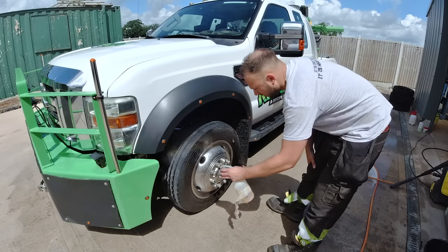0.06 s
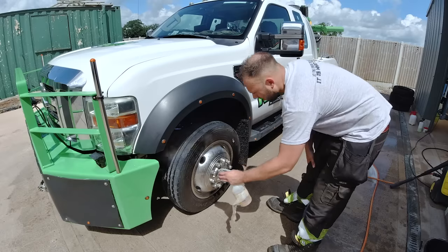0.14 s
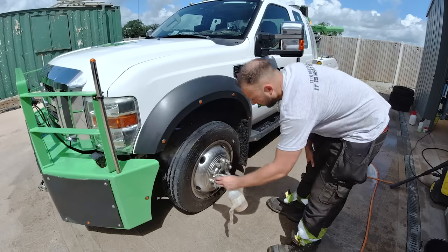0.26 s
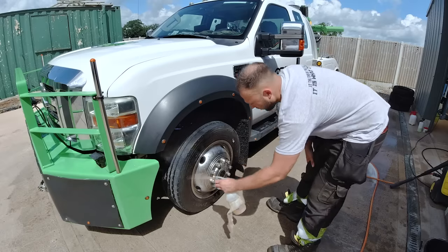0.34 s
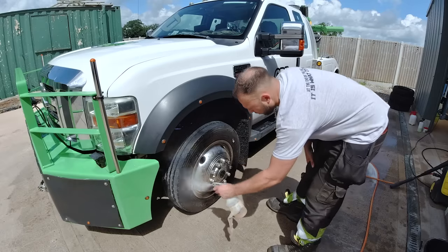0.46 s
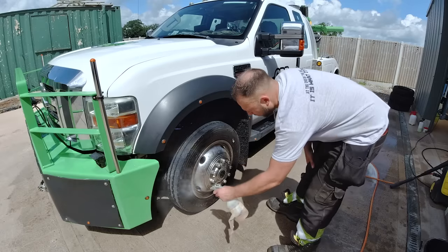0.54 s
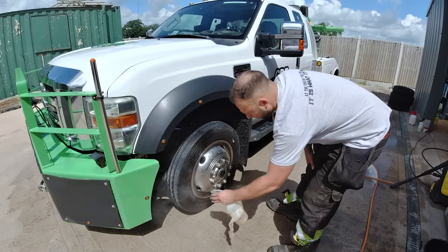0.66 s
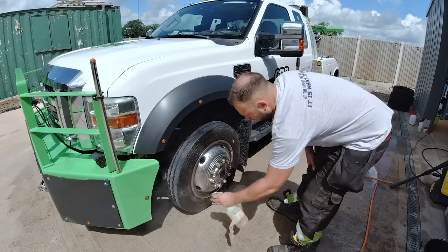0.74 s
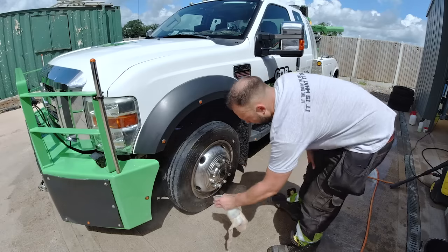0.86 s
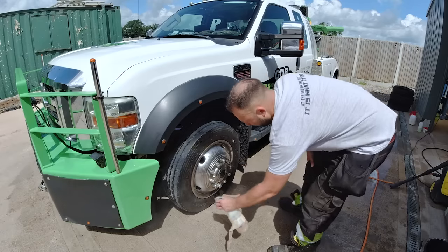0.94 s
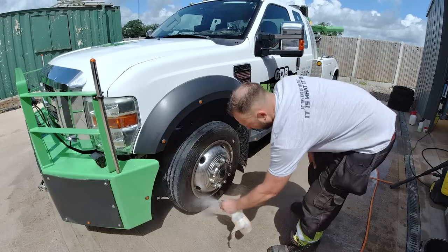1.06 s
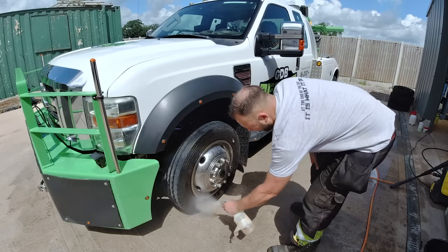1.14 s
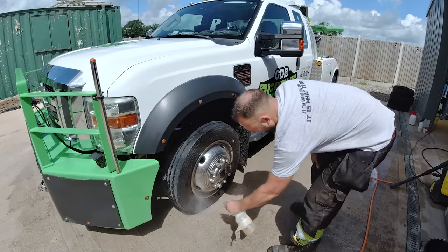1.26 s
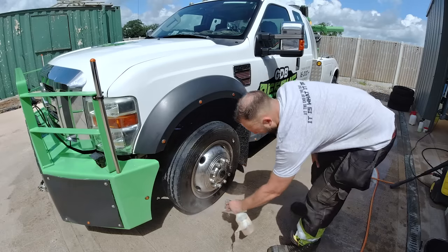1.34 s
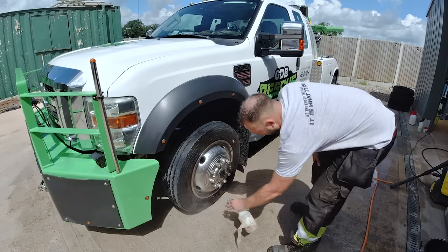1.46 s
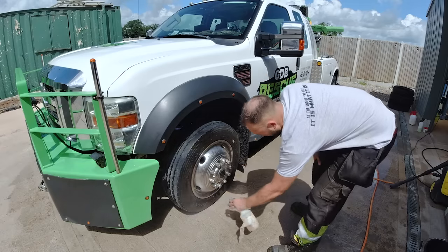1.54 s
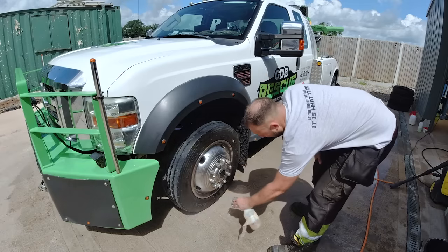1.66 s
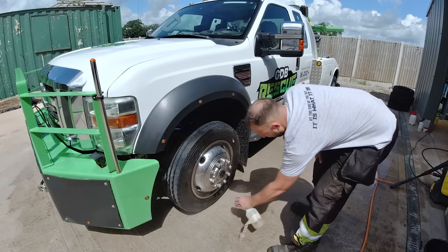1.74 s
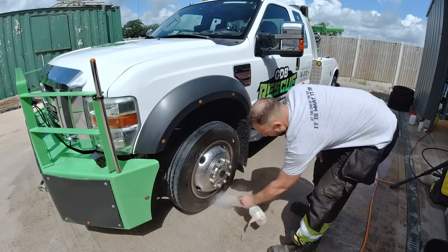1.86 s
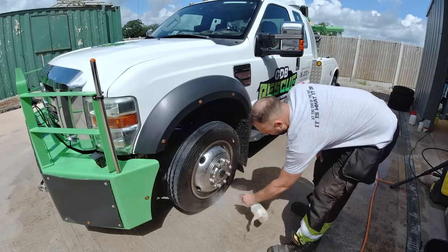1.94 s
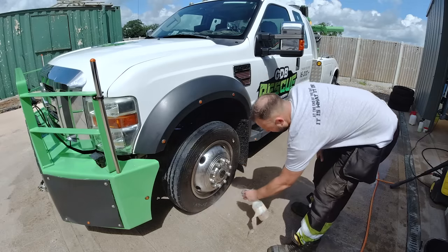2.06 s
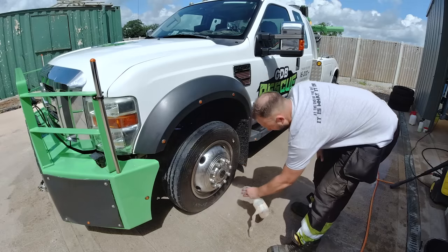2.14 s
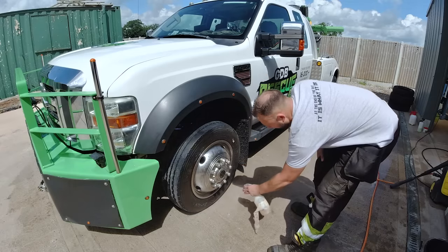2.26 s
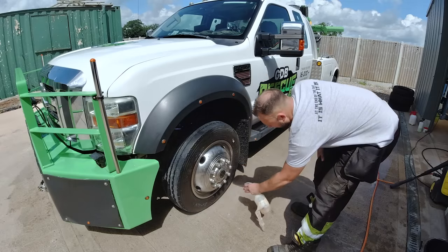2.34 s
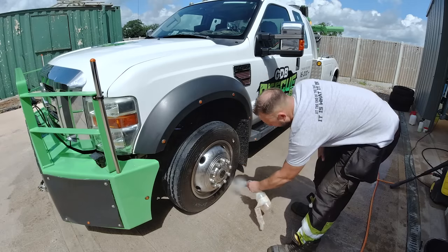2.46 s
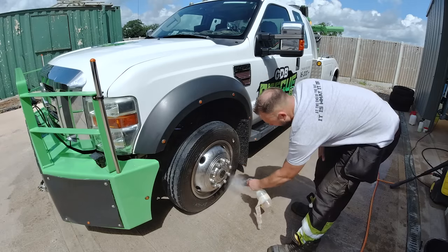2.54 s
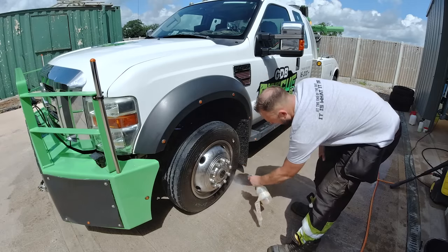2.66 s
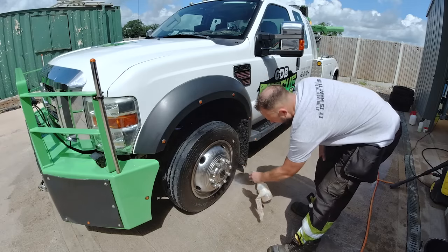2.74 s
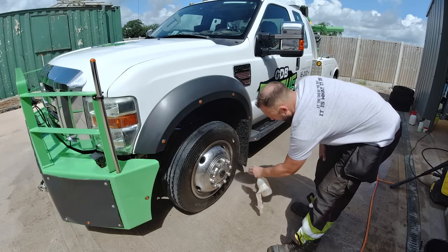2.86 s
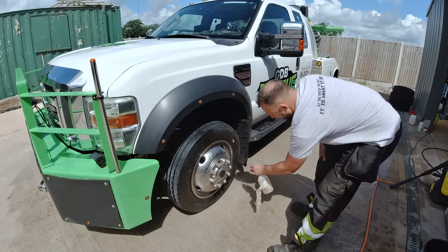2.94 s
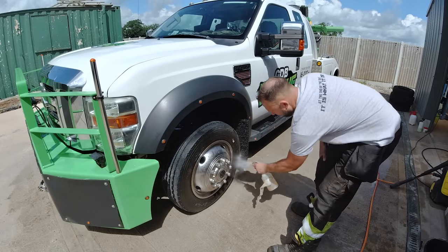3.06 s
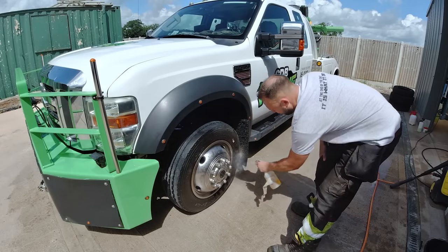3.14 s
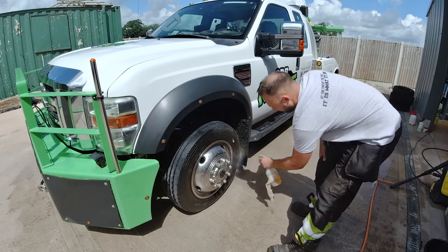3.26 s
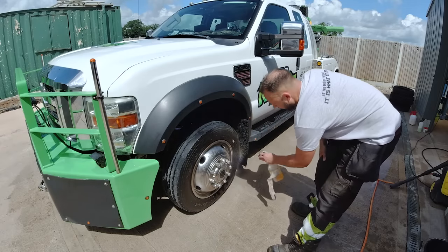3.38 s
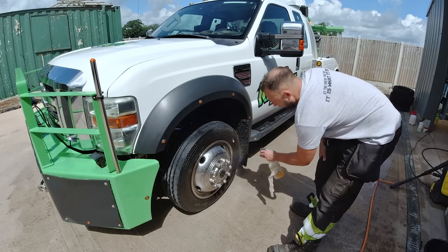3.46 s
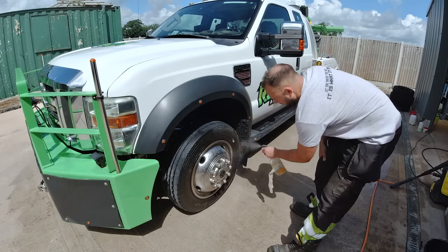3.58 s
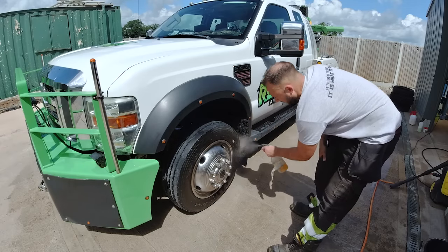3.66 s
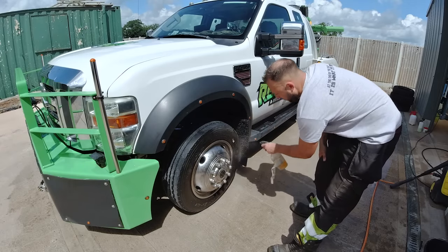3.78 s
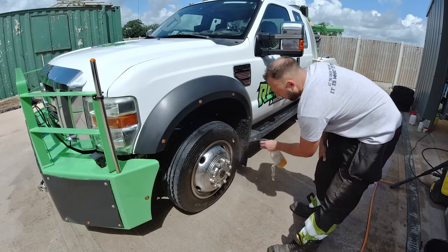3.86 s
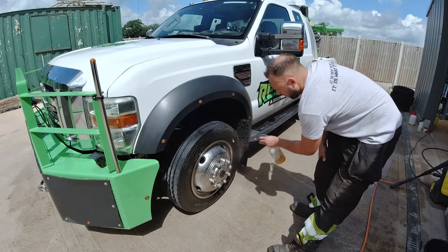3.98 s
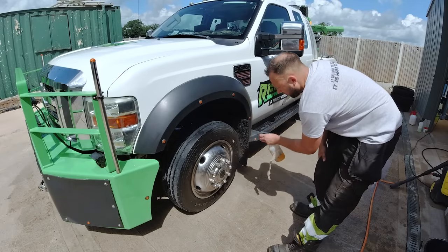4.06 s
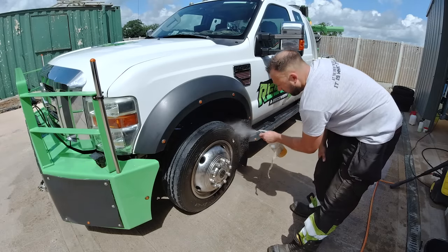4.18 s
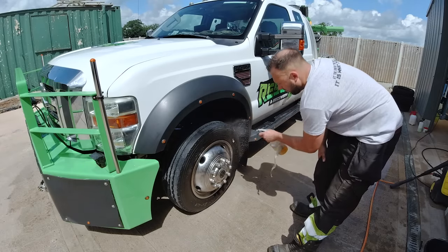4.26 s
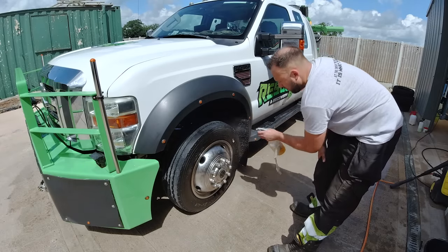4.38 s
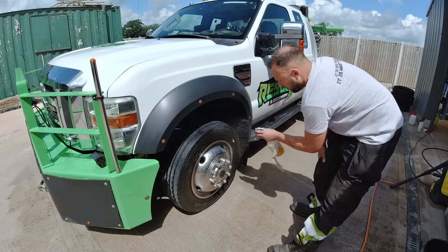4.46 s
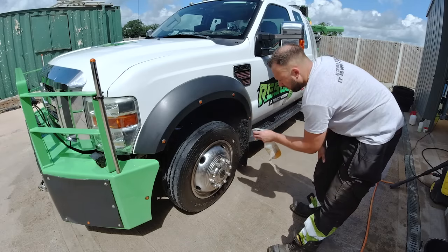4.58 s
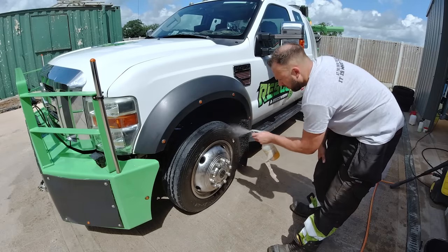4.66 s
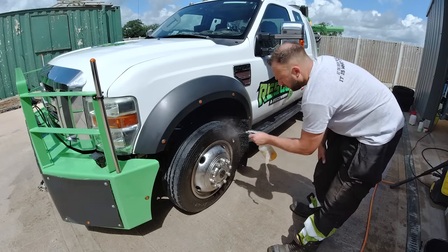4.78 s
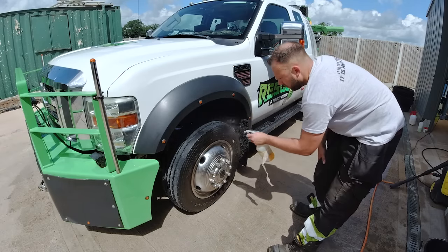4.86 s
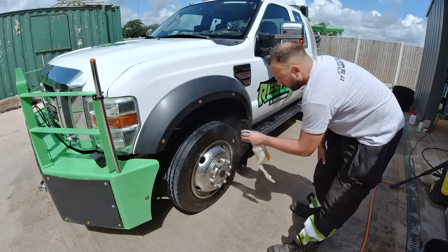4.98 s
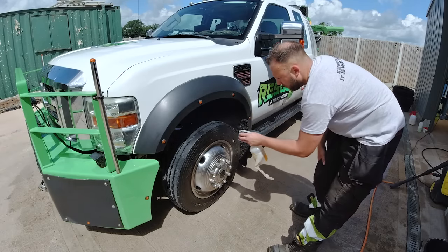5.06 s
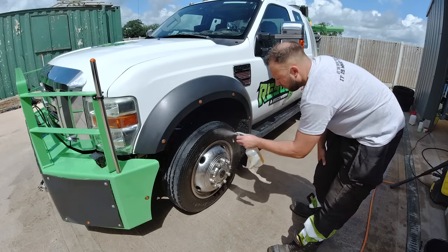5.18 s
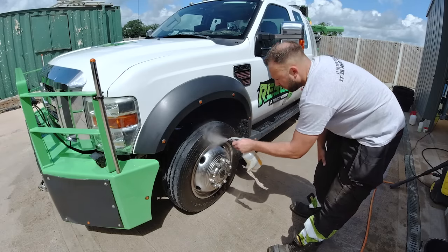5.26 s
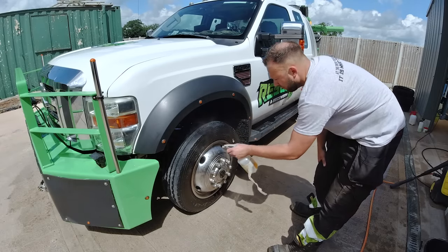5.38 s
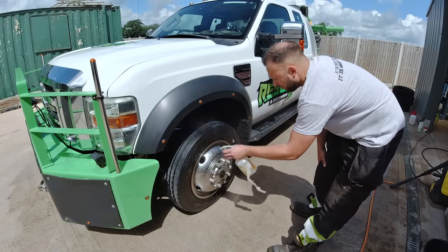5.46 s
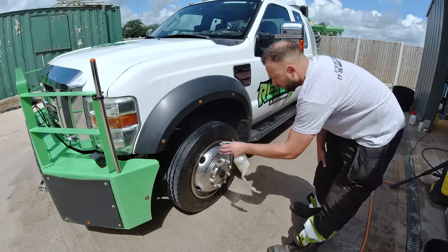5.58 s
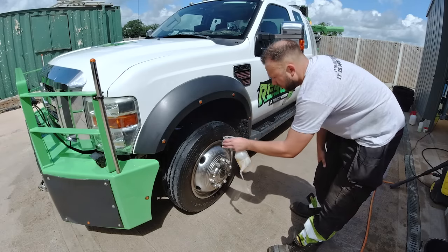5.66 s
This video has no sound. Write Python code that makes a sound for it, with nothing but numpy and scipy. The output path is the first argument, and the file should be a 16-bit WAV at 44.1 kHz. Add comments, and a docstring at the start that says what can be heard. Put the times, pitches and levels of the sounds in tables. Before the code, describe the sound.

Crisp, evenly paced squirts of fine mist outdoors, with trigger clicks, faint air whistles, a brief shoe scuff and very faint distant engine hum.

```python
"""Trigger bottle in an open yard

A hand trigger bottle is pumped nine times at a truck tyre, after the fading end of an earlier spray.
Each squeeze is banded noise: dull drops open first and close last around the bright mist, with a spit
and thumps of the bottle. Between squeezes the trigger creaks as ringing noise, and air squeaks, whistles
and pops into the bottle. A shoe knocks and scuffs on concrete; filtered noise and wavering low tones
make the yard and far engines."""
import sys
import numpy as np
from scipy import signal
from scipy.fft import rfft, irfft, next_fast_len
from scipy.io import wavfile

SR = 44100
rng = np.random.default_rng(int(sys.argv[2]) if len(sys.argv) > 2 else 0)


def int16_out(signal):
    """Quantize to a 16-bit WAV file."""
    q = np.round(np.clip(np.atleast_2d(signal).T, -1, 1) * 32767)
    wavfile.write(sys.argv[1], SR, q.astype(np.int16))


N = 252187
TIME = np.arange(N) / SR


def amp(db):
    """Turn decibels into a linear gain."""
    return 10 ** (np.asarray(db) / 20)


def rms_one(x):
    """Scale a signal to rms 1."""
    return x / np.sqrt(np.mean(x ** 2) + 1e-20)


def add(out, s, sound):
    """Mix a sound in at time s."""
    i = max(round(s * SR), 0)
    out[i:i + len(sound)] += sound[:N - i]


def lowpass(x, hz, order=2):
    """Roll off the treble above hz."""
    return signal.sosfilt(signal.butter(order, hz, fs=SR, output="sos"), x)


def at_hz(points, hz):
    """Read a spectrum's gain at these frequencies, in straight dB lines over log frequency."""
    f, db = np.transpose(points)
    return amp(np.interp(np.log(hz + 1), np.log(f), db))


def coloured(x, spectrum):
    """Give a steady signal a spectrum; rms 1."""
    half = next_fast_len(N)
    gain = at_hz(spectrum, np.linspace(0, SR / 2, half + 1))
    return rms_one(irfft(rfft(x, 2 * half) * gain)[:N])


def resonate(x, hz, width_hz):
    """Two-pole resonance with gain 1 on top."""
    r = np.exp(-np.pi * width_hz / SR)
    zeros = np.array([1, 0, -1]) * (1 - r * r) / 2
    return signal.lfilter(zeros, [1, -2 * r * np.cos(2 * np.pi * hz / SR), r * r], x)


def resonant_noise(size, hz, width_hz, second_hz, second_width_hz):
    """Noise through two resonances in a row; rms 1."""
    first = resonate(rng.standard_normal(size), hz, width_hz)
    return rms_one(resonate(first, second_hz, second_width_hz))


def wavering_tone(hz, width_hz):
    """A tone on a pitch track whose strength and phase wander, spreading it over a narrow band."""
    size = len(hz)
    white = rng.standard_normal((2, size + SR))
    a, b = lowpass(white, width_hz / 2)[:, SR:]   # the first second lets the filter settle
    phase = 2 * np.pi * np.cumsum(hz) / SR
    return rms_one(a * np.cos(phase) + b * np.sin(phase))


# colour of the open air: (frequency [Hz], relative density [dB per Hz])
YARD_COLOUR = [(13, -28), (24, -2.5), (33, -8), (80, -9), (146, -11.5), (275, -10.5), (360, -9.5),
               (800, -24.5), (1050, -21.5), (1630, -25.5), (2680, -26), (4270, -29.5), (8950, -34.5),
               (15500, -61)]
# swells of a far engine's drone: (loudest time [s], level added at the peak [dB])
ENGINE_SWELLS = [(3.281, -68.5), (4.28, -66)]
YARD_DB = -68
SWELL_S, DRONE_DB = 0.17, -81   # time from a swell's peak to 1/e; level between swells


def background(idle_db=-73, idle_hz=67, hum_db=-76, hum_hz=51):
    """Open-air rumble with a far engine's firing note, its swelling octave and a deeper hum."""
    air = amp(YARD_DB) * coloured(rng.standard_normal(N), YARD_COLOUR)
    firing_hz = np.full(N, idle_hz)
    firing = amp(idle_db) * wavering_tone(firing_hz, width_hz=17)
    swelling = amp(DRONE_DB) + sum(amp(db) * np.exp(-((TIME - s) / SWELL_S) ** 2) for s, db in ENGINE_SWELLS)
    steady_octave = np.sin(2 * np.pi * 2 * idle_hz * TIME)
    drone = swelling * rms_one(steady_octave + .7 * wavering_tone(2 * firing_hz, width_hz=17))
    hum = amp(hum_db) * wavering_tone(np.full(N, hum_hz), width_hz=13)
    return air + drone + hum + firing


YARD_T60_S = 0.61


def yard_echo(x, early_db=-15, early_t60=0.19, early_hz=9000, late_db=-25, late_hz=4500, delay_s=0.0076):
    """Truck and ground answer at once; fence and shed scatter a weak, duller and longer tail."""
    t = np.arange(SR // 2) / SR
    tail = 0
    for db, t60, top_hz in (early_db, early_t60, early_hz), (late_db, YARD_T60_S, late_hz):
        scatter = rng.standard_normal(len(t)) * amp(-60 * t / t60) * (t > delay_s)
        tail = tail + amp(db) * lowpass(scatter / np.linalg.norm(scatter), top_hz, order=1)
    return signal.fftconvolve(x, tail)[:N]


def knocks(table, contact_s, rough):
    """Each knock is one heavily damped resonance with a little rattle in it."""
    out, t = np.zeros(N), np.arange(SR // 8) / SR
    for s, level_db, hz, t60 in table:
        rattle = resonant_noise(len(t), hz, hz, hz, 2 * hz)
        envelope = amp(level_db - 60 * t / t60) * (1 - np.exp(-t / contact_s))
        add(out, s, envelope * (np.sin(2 * np.pi * hz * t) + rough * rattle))
    return out


# a shoe meets the concrete; the last row is a valve pop of the bottle:
# (time [s], level before the contact softens it [dB], pitch [Hz], t60 [s])
STEPS_AND_POP = [(1.047, -31, 248, 0.024), (1.091, -37, 303, 0.042), (1.427, -33, 438, 0.033),
                 (1.448, -36, 483, 0.053), (1.464, -44.5, 524, .06), (1.557, -40.5, 1245, 0.035)]
# the sole scuffs: (start [s], length [s], rubbing level [dB], grit level [dB])
SOLE_SCUFFS = [(.94, 0.032, -60, -65.5), (1.049, 0.13, -52.5, -55), (1.183, 0.23, -68.5, -64),
               (1.438, 0.07, -57.5, -62.5), (1.531, 0.092, -59.5, -68), (1.631, .2, -67.5, -72.5)]
# colours of the rubbing sole and of the grit: (frequency [Hz], relative density [dB per Hz])
RUB_COLOUR = [(60, -13), (160, -4), (450, -4), (800, -10), (1300, -5.5), (2500, -39.5), (6000, -55)]
GRIT_COLOUR = [(300, -28.5), (800, -3), (1300, 4.5), (2100, -1), (2900, -3), (6000, -10.5), (10000, -30.5),
               (15000, -43)]
SCUFF_ATTACK_S, SCUFF_T60_S = .012, 0.1


def shoe_and_pop(grains_per_s=1500):
    """The sole lands, rubs and rolls over grit in scuffs that rise, hold and die; one valve pop joins in."""
    grains = rng.standard_normal(N) * ((rng.random(N) < grains_per_s / SR) + 0.053)
    rub = coloured(rng.standard_normal(N), RUB_COLOUR)
    grit = coloured(grains, GRIT_COLOUR)
    out = knocks(STEPS_AND_POP, contact_s=0.0018, rough=0.35)
    for start, length, rub_db, grit_db in SOLE_SCUFFS:
        rise = np.clip((TIME - start) / SCUFF_ATTACK_S, 0, 1)
        fall = amp(-60 * np.clip((TIME - start - length) / SCUFF_T60_S, 0, 2))
        out += rise * fall * (amp(rub_db) * rub + amp(grit_db) * grit)
    return out


# resonances of the spray head: (centre [Hz], width [Hz], level [dB])
HEAD_RESONANCES = [(1480, 500, 0.5), (2397, 120, -0.5), (2900, 200, -6), (3240, 730, -3), (4200, 300, -7.5)]
RETURN_S = .075   # half the time that the piston takes to slide back


def refill(level_db=-73, slips_per_s=700, after_s=0.18, top_hz=4500):
    """After each squeeze the wet piston slides back with a faint, grainy rub."""
    sliding = sum(np.exp(-((TIME - row[1] - after_s) / RETURN_S) ** 2) for row in SQUEEZES)
    slips = (rng.random(N) < slips_per_s / SR) * rng.standard_normal(N) + 1e-18
    rub = np.zeros(N)
    for k, (hz, width_hz, db) in enumerate(HEAD_RESONANCES):
        rub += (-1) ** k * amp(db) * rms_one(resonate(slips, hz, width_hz))   # alternate polarity
    return amp(level_db) * sliding * rms_one(lowpass(rub, top_hz))


def squeaks(table):
    """Air or liquid forced through a wet slit sounds a short, gliding, breathy note."""
    out = np.zeros(N)
    for s, length, level_db, first_hz, last_hz, width_hz in table:
        size = round(length * SR)
        note = wavering_tone(np.linspace(first_hz, last_hz, size), width_hz)
        add(out, s, amp(level_db) * signal.windows.tukey(size, .5) * note)
    return out


# whistles after the first two squeezes: (start [s], length [s], level before the fades and flicker [dB])
VENT_WHISTLES = [(0.601, 0.18, -68), (0.833, .19, -72.5), (1.26, .29, -73.5)]
WHISTLE_HZ, WHISTLE_RISE_HZ, WHISTLE_WIDTH_HZ = 5650, 170, 100
WHISTLE_FLICKER_DB, WHISTLE_FLICKER_S = 1, .025   # scale of the flicker; time between its random points


def vent():
    """A thin, flickering whistle that rises slightly as air refills the bottle."""
    steps = np.arange(0, TIME[-1], WHISTLE_FLICKER_S)
    glide = (WHISTLE_HZ, WHISTLE_HZ + WHISTLE_RISE_HZ, WHISTLE_WIDTH_HZ)
    whistle = squeaks([(*row, *glide) for row in VENT_WHISTLES])
    flicker = np.interp(TIME, steps, rng.uniform(-1.8, 1, len(steps)))
    return whistle * amp(WHISTLE_FLICKER_DB * flicker)


# short wet squeaks: (start [s], length [s], level before the fades [dB], first and last pitch [Hz], width [Hz])
WET_SQUEAKS = [(.826, 0.011, -47.5, 2990, 4390, 200), (.933, .055, -56, 1605, 1940, 300),
               (1.045, .1, -59.5, 6500, 7330, 442)]


def wet_squeaks():
    """Single squeaks of air or liquid in a wet slit."""
    return squeaks(WET_SQUEAKS)


# the valve pops as the pump refills: (time [s], level of the low note before the head's filter [dB],
# pitch [Hz], t60 [s])
VALVE_POPS = [(4.539, -39, 1620, 0.0067), (5.0712, -38, 1300, 0.012), (5.5889, -39.5, 1196, 0.011)]


def pops(push_s=0.00061, snap_db=-10, snap_ratio=2.1, snap_t60=0.0037, clatter_db=-18, clatter_t60=0.048,
         lowest_hz=750, top_hz=4200):
    """The valve's low note, an upper snap and a clatter; the small, soft head passes the middle range."""
    out, t = np.zeros(N), np.arange(SR // 8) / SR
    for s, level_db, hz, t60 in VALVE_POPS:
        note = np.sin(2 * np.pi * hz * t) * amp(-60 * np.maximum(t - push_s, 0) / t60)
        snap = np.sin(2 * np.pi * snap_ratio * hz * t) * amp(snap_db - 60 * t / snap_t60)
        clatter = resonant_noise(len(t), hz, hz, 2 * hz, 2 * hz) * amp(clatter_db - 60 * t / clatter_t60)
        add(out, s, amp(level_db) * (note + snap + clatter))
    head = signal.butter(2, [lowest_hz, top_hz], "band", fs=SR, output="sos")
    return signal.sosfilt(head, out + 1e-18)


# the trigger takes up its slack with a tick just before each squeeze
SLACK_LEAD_S, SLACK_DB, SLACK_HZ, SLACK_T60_S = 0.011, -52, 2050, 0.017
# fainter random ticks as the trigger returns: time range after the stop, mean level, spread, pitch range, ring
TICK_AFTER_S, TICK_DB, TICK_SPREAD_DB, TICK_HZ, TICK_T60_S = (.09, 0.23), -60, 1.5, (1880, 3380), .03


def trigger_ticks(count=4):
    """List each stroke's small creaks: one as the slack is taken up, a few at random on the way back."""
    rows = []
    for start, stop, *_ in SQUEEZES:
        rows.append((start - SLACK_LEAD_S, SLACK_DB, SLACK_HZ, SLACK_T60_S))
        for _ in range(count):
            s = stop + rng.uniform(*TICK_AFTER_S)
            level_db = rng.normal(TICK_DB, TICK_SPREAD_DB)
            rows.append((s, level_db, rng.uniform(*TICK_HZ), TICK_T60_S))
    return rows


# the fading end of an earlier spray, then the loudest creaks of the plastic trigger:
# (time [s], level before decay and filter [dB], centre [Hz], t60 [s])
SPRAY_END_AND_CREAKS = [(.002, -43, 4330, 0.12), (.06, -55.5, 1890, 0.12), (.138, -45.5, 3300, 0.044),
                        (.654, -50.5, 2380, 0.15), (.719, -42.5, 2300, 0.027), (.809, -54, 3530, 0.054),
                        (.829, -52, 3880, 0.096), (1.48, -43.5, 2730, 0.047), (1.556, -51.5, 2920, 0.026),
                        (1.733, -50.5, 2850, 0.022), (2.086, -54.5, 1930, 0.131),
                        (2.112, -55.5, 2203, 0.038), (2.741, -47.5, 3140, 0.026), (2.76, -56, 2330, 0.046),
                        (2.823, -52, 2900, .025), (3.309, -54, 2300, 0.027), (3.451, -57.5, 3300, 0.051),
                        (3.937, -55.5, 2780, 0.03), (4.383, -50, 3500, .016), (4.401, -58, 3200, 0.043),
                        (4.477, -56, 2880, 0.038), (4.941, -56.5, 3000, 0.023), (5.482, -54.5, 3150, 0.02)]


def spray_end_and_creaks(width_hz=450, body_hz=3100, body_width_hz=4500, ring_share=1.6, attack_s=.0018,
                         tick_share=0.26, tick_t60=0.0065, top_hz=6500):
    """The trigger slips with a tick, then rasps around one pitch; a spray's fading end is made the same way."""
    out, t = np.zeros(N), np.arange(SR // 6) / SR
    for s, level_db, hz, t60 in [*SPRAY_END_AND_CREAKS, *trigger_ticks()]:
        rasp = resonant_noise(len(t), body_hz, body_width_hz, body_hz, body_width_hz)
        ring = rms_one(resonate(rasp, hz, width_hz))
        rub = rms_one(rasp + ring_share * ring) * amp(-60 * t / t60)
        tick = tick_share * rasp * amp(-60 * t / tick_t60)
        add(out, s, amp(level_db) * (1 - np.exp(-t / attack_s)) * (tick + rub))
    return lowpass(out + 1e-18, top_hz)


# thumps as the grip closes, at the pressure peak and on the rebound:
# (time after the start [s], level against the squeeze's thump [dB])
THUMPS_PER_SQUEEZE = [(-.007, -9), (.053, 0.5), (.084, -6)]
THUMP_HZ, THUMP_T60_S = 255, 0.024


def thumps():
    """The bottle thumps under the hand in the same pattern at every squeeze."""
    rows = []
    for start, *_, thump_db in SQUEEZES:
        rows += [(start + after_s, thump_db + db, THUMP_HZ, THUMP_T60_S) for after_s, db in THUMPS_PER_SQUEEZE]
    return knocks(rows, contact_s=0.0018, rough=0.62)


# every squeeze opens with a dribble and a spit: (time after the start [s], length [s],
# level against the squeeze [dB], first pitch [Hz], last pitch [Hz], width [Hz]); pitches shift each time
SPITS_PER_SQUEEZE = [(-.012, .016, -23.5, 1263, 1600, 501), (.003, .014, -12.5, 1650, 2210, 499),
                     (.006, .016, -19, 3895, 4400, 800)]
SPIT_SPREAD = .08   # largest relative pitch shift of a squeeze, up or down


def spits():
    """The first liquid spits from the nozzle before the mist forms, at a slightly different pitch each time."""
    rows = []
    for start, _, level_db, *_ in SQUEEZES:
        pitch = 1 + SPIT_SPREAD * rng.uniform(-1, 1)
        for after_s, length, db, first_hz, last_hz, width_hz in SPITS_PER_SQUEEZE:
            rows.append((start + after_s, length, level_db + db, pitch * first_hz, pitch * last_hz, width_hz))
    return squeaks(rows)


def glance(x, share, longest_s, count=6):
    """Rim, tyre and hand throw back near reflections that ripple the spectrum anew at each aim."""
    out = x.copy()
    for lag, sign in zip(rng.uniform(longest_s / 10, longest_s, count), rng.choice([-1, 1], count)):
        i = round(lag * SR) + 1
        out[i:] += sign * share * x[:-i]
    return out


# colour of the mist before each squeeze's tilt: (frequency [Hz], relative density [dB per Hz])
MIST_COLOUR = [(240, -43.5), (400, -21), (821, -25.5), (1100, -13), (1190, -9.5), (1690, -6), (2550, -7),
               (2970, -3.5), (3970, -3.5), (4220, -3), (5150, -3.5), (6190, -0.5), (8400, 0.5), (11100, -1),
               (15500, -6.5)]
LEAD_IN_S = .03   # room before the start for the soft opening


def squeeze(length, bright_db, peak_at, peak_db, build_s=0.028, build_power=0.62, open_s=0.012, close_s=0.0058,
            linger_s=0.0062, sag_db=1.0, peak_s=0.0028, swell_db=3.0, swell_lead_s=0.035, swell_s=.011,
            swell_hz=4000, sputter_db=1.6, sputter_s=0.0082):
    """Coarse, dull drops come first; fine bright mist needs full pressure, so it starts later, stops sooner."""
    t = np.arange(SR // 4) / SR - LEAD_IN_S
    hz = np.linspace(0, SR / 2, len(t) // 2 + 1)
    tilt = amp(bright_db * np.log2((hz + 1) / 6000))
    hiss = rfft(rng.standard_normal(len(t))) * at_hz(MIST_COLOUR, hz) * tilt
    hiss = hiss / np.std(irfft(hiss))
    swell = np.exp(-((t - peak_at + swell_lead_s) / swell_s) ** 2)   # the flow overshoots while the cone opens
    surge = np.exp(-((t - peak_at) / peak_s) ** 2)   # pressure spikes as the trigger reaches full speed
    sag = amp(-sag_db * np.clip((t - peak_at) / (length - peak_at), 0, 1))
    edges = np.geomspace(100, 16000, 23)
    out = np.zeros(len(t))
    for low, high in zip(edges, edges[1:]):
        fine = high / 10000   # fineness of the drops, 1 at 10 kHz
        opening = (1 + np.tanh((t - build_s * fine ** build_power) / open_s)) / 2
        closing = (1 - np.tanh((t - length + linger_s * np.log2(fine)) / (2 * close_s))) / 2
        uneven = rng.standard_normal(size=64)
        sputter = sputter_db * np.interp(t, np.arange(len(uneven)) * sputter_s, uneven)
        surge_accent = peak_db * surge * min(fine, 1) ** .7
        swell_accent = swell_db * swell * np.exp(-np.log2(high / swell_hz) ** 2 / 2)
        band = irfft(hiss * ((hz >= low) & (hz < high)), len(t))
        out += band * opening * closing * amp(surge_accent + swell_accent + sputter)
    return out * sag


# squeezes: (start [s], stop [s], level before accents and reflections [dB], brightness [dB per octave],
# pressure peak at the finest drops [dB], reference level of the bottle's thumps [dB])
SQUEEZES = [(0.424, 0.574, -33.5, -0.6, 0, -53.5), (1.117, 1.251, -35, -0.46, 6, -49),
            (1.867, 1.986, -34, -1.14, 3, -37), (2.5, 2.618, -35, -0.15, 8.5, -33),
            (3.054, 3.168, -34, 0.25, 7.5, -45), (3.628, 3.739, -34.5, -0.4, 10.5, -40),
            (4.165, 4.274, -35.5, -0.76, 10.5, -39.5), (4.713, 4.82, -35, -0.5, 7, -38.5),
            (5.254, 5.356, -35, -0.7, 5.5, -41.5)]
PEAK_AFTER_S = .056   # the pressure peaks this long after each start
PEAK_HZ, PEAK_Q = (1800, 11700), 16   # range and sharpness of random narrow peaks that colour each spray's noise


def sprays(peak_share=0.29, drum_db=-26, drum_hz=300, drum_width_hz=480, flight_s=0.055):
    """The jets, each with its own random peaks and reflections, then their soft drumming on the rubber."""
    out = np.zeros(N)
    for start, stop, level_db, bright_db, peak_db, _ in SQUEEZES:
        jet = squeeze(stop - start, bright_db, PEAK_AFTER_S, peak_db)
        peaks_hz = rng.uniform(*PEAK_HZ, size=3)
        peaks = sum(resonate(jet, hz, hz / PEAK_Q) for hz in peaks_hz)
        jet = glance(jet + peak_share * peaks, share=0.084, longest_s=.004)
        t = np.arange(len(jet)) / SR - LEAD_IN_S
        wetting = np.sin(np.pi * np.clip((t - flight_s) / (stop - start - .02), 0, 1)) ** 2
        drum = resonant_noise(len(t), drum_hz, drum_width_hz, drum_hz, drum_width_hz)
        add(out, start - LEAD_IN_S, amp(level_db) * (jet + amp(drum_db) * wetting * drum))
    return out


def scene():
    """Bottle and shoe close by, their echo and the yard, alike in both channels."""
    quiet_parts = refill() + vent() + wet_squeaks() + pops() + spray_end_and_creaks()
    strokes = thumps() + spits() + sprays()
    near = quiet_parts + strokes + shoe_and_pop()
    return np.tile(near + yard_echo(near) + background(), (2, 1))


CUTOFF_HZ = 15750


def record(dry):
    """The top is cut steeply."""
    return signal.sosfilt(signal.ellip(12, .1, 80, CUTOFF_HZ, fs=SR, output="sos"), dry)


dry = scene()
out = record(dry)
int16_out(out)
```